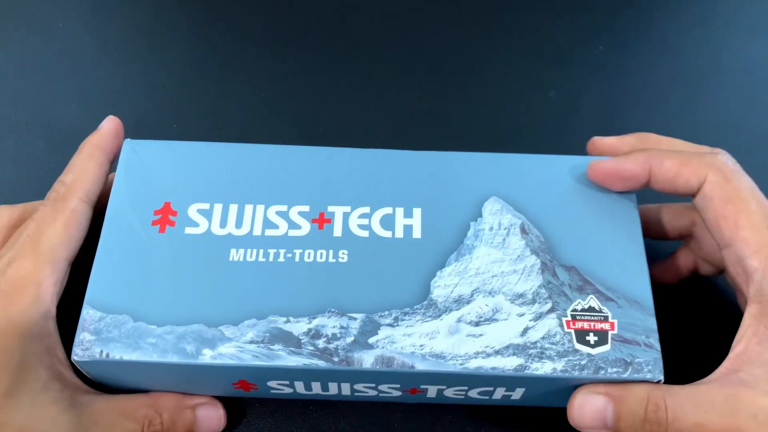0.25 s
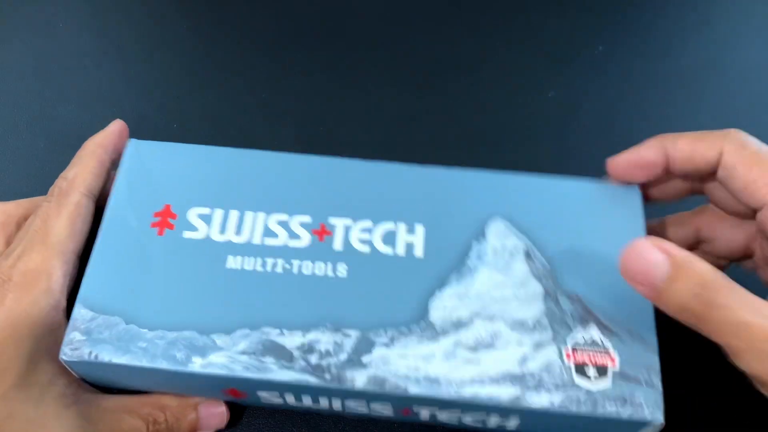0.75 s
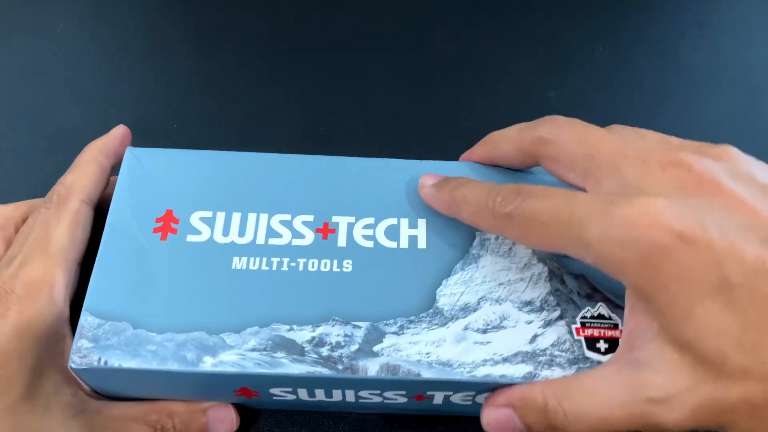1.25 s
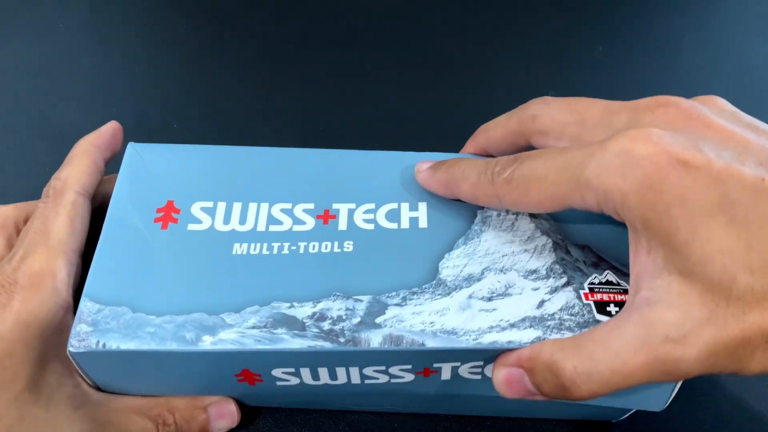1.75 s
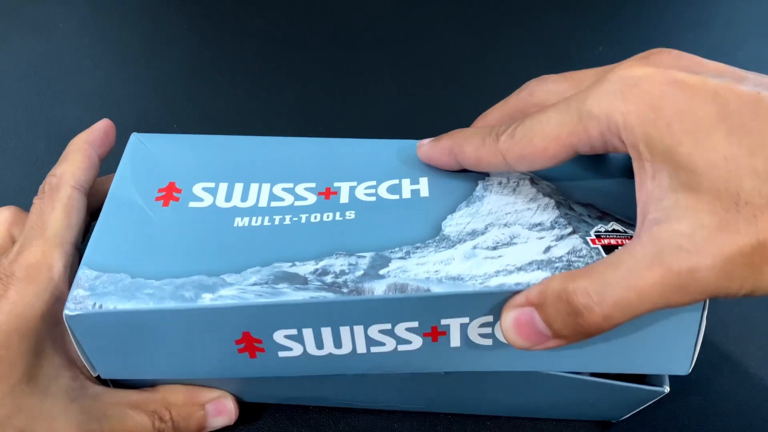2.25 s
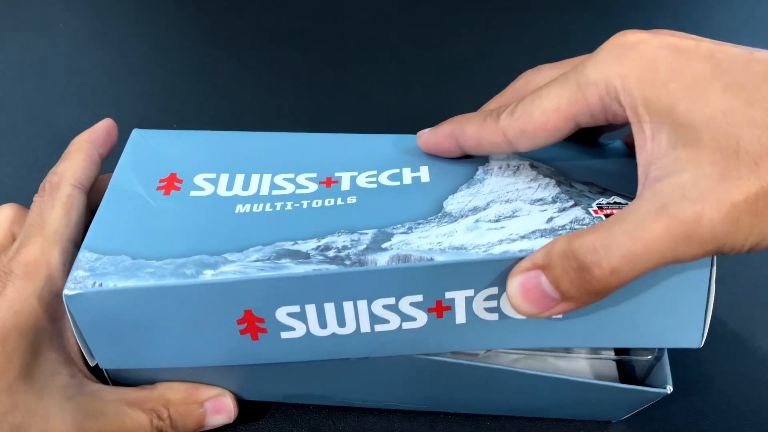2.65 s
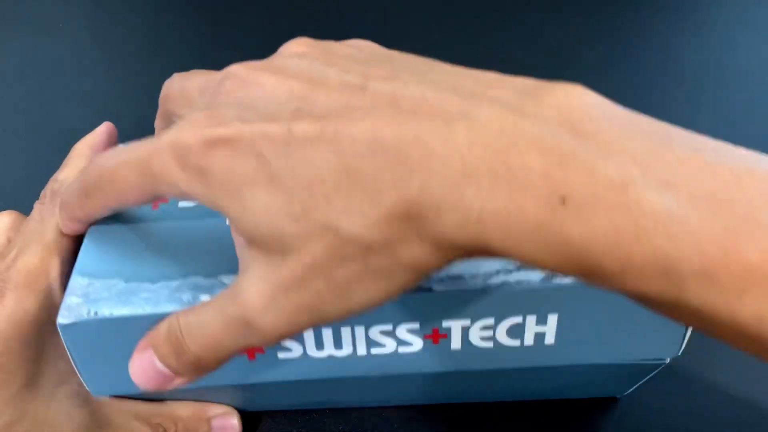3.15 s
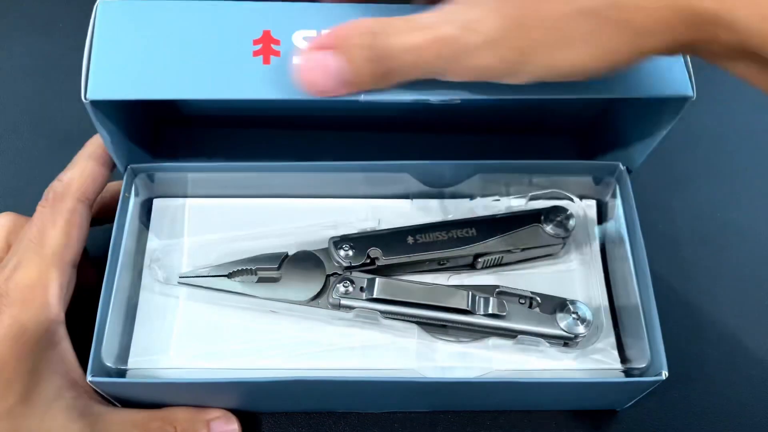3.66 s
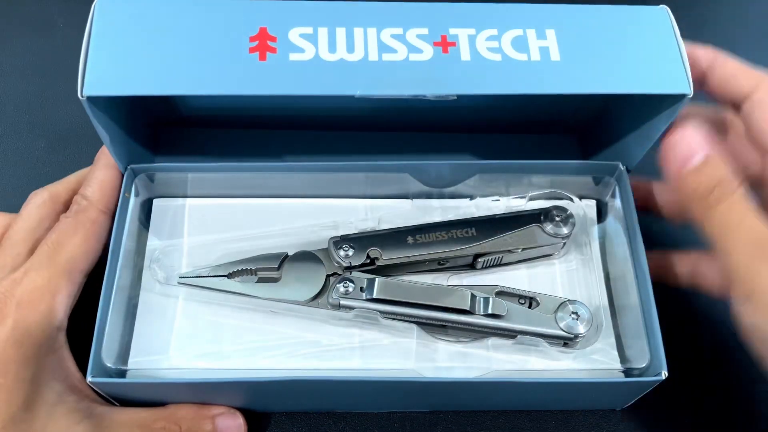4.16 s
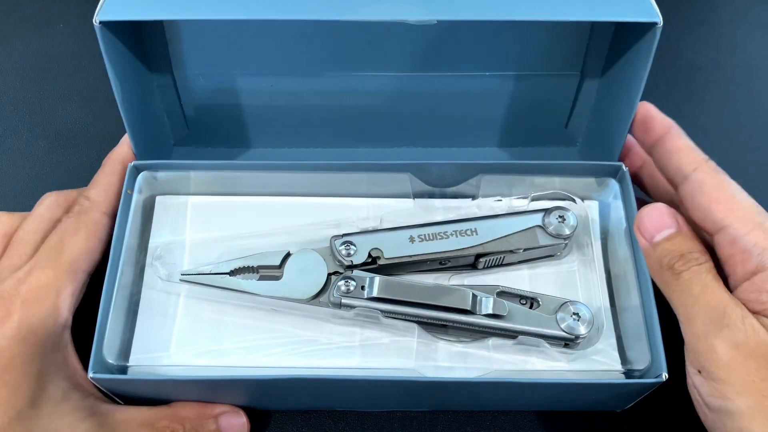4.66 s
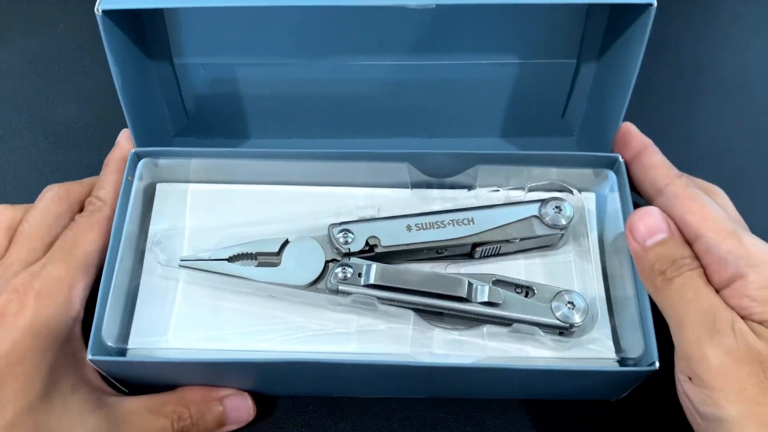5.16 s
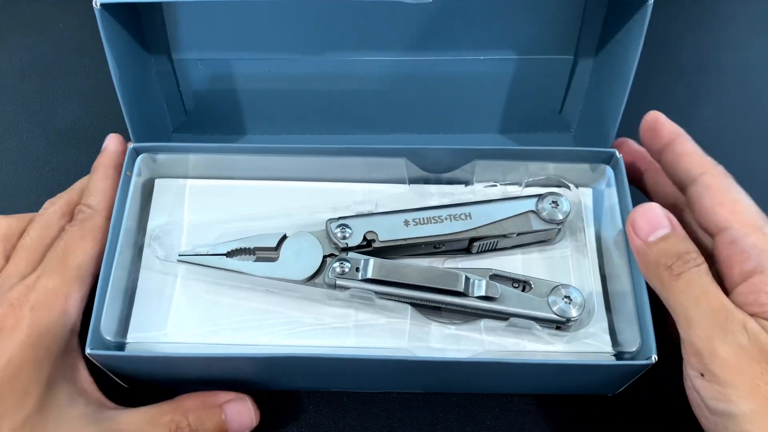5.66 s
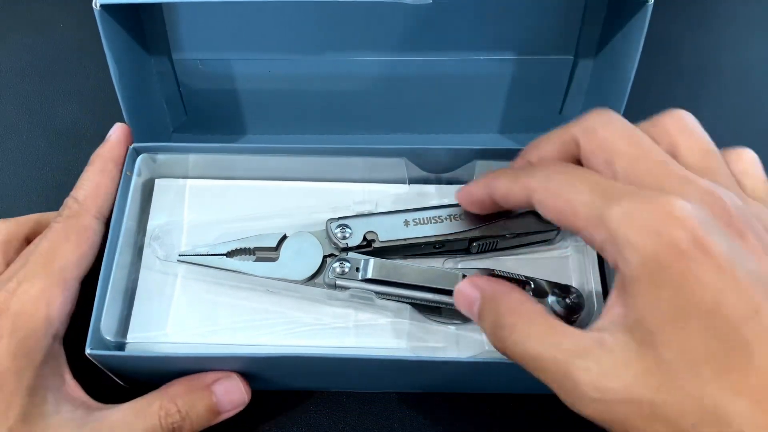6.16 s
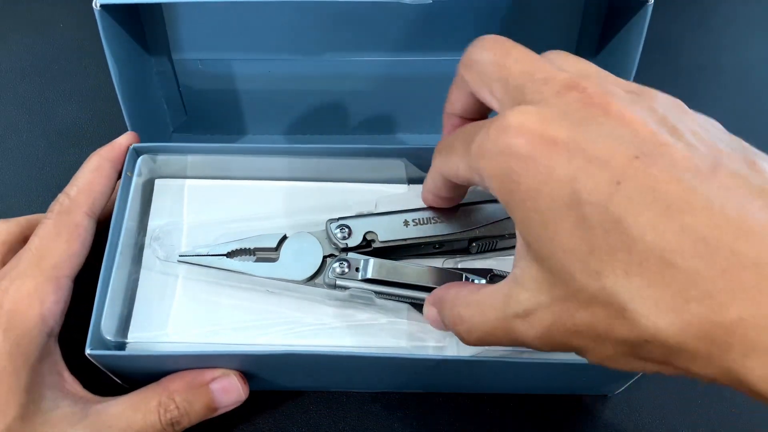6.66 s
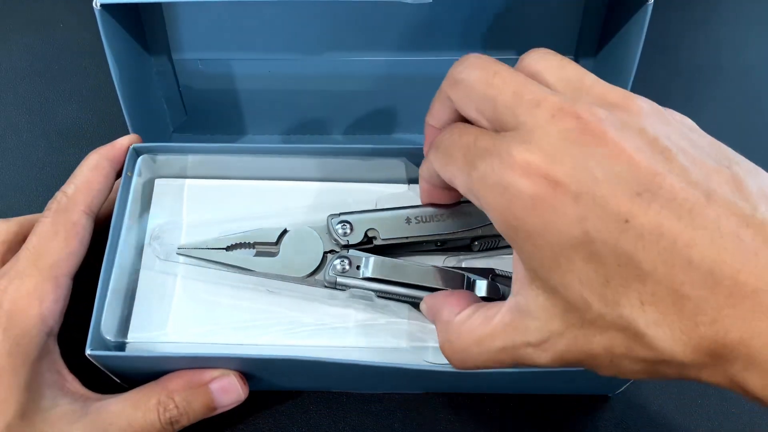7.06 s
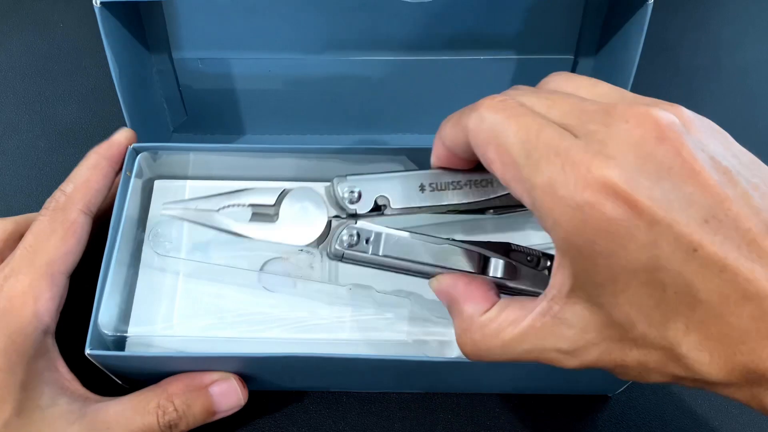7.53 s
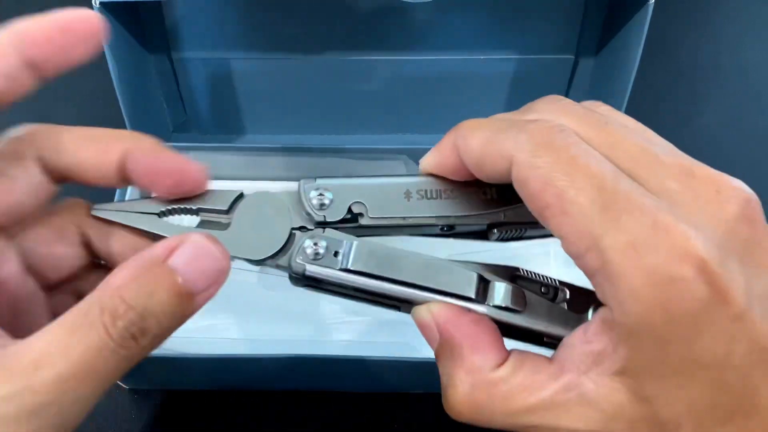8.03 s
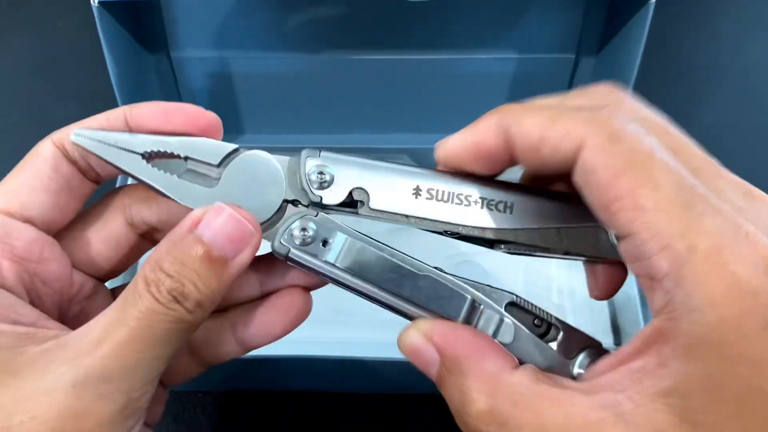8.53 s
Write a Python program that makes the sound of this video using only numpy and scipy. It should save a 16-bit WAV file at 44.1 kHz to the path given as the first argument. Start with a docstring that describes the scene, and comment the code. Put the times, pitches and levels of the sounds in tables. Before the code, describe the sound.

Close cardboard taps and a droning lid scrape lead to one hollow knock, faint rustles, then a sharp plastic snap in a quiet room.

```python
"""Taps, scrapes and a hard knock of cardboard, then plastic clicks that end in a loud snap, close by.
Hands turn a carton on a desk, drag its tight lid up and knock it open,
then press on the plastic tray inside until a steel multi-tool snaps free.
Blows ring damped panel modes and friction is made of random slips shaped by the walls; noise bands
give soft, gliding hiss and one very short tick. Behind lie room hiss and faint ventilation tones."""
import sys
import numpy as np
from scipy import signal
from scipy.fft import rfft, irfft, next_fast_len
from scipy.io import wavfile

SR = 44100
rng = np.random.default_rng(int(sys.argv[2]) if len(sys.argv) > 2 else 0)


def wav_record(signal):
    """Record a signal, one row per channel, as 16-bit PCM in the file named by sys.argv[1]."""
    frames = np.transpose(np.atleast_2d(signal))
    bounded = np.clip(frames, -1, 1)
    # unit amplitude maps onto the largest positive 16-bit level
    quanta = np.round(bounded * 32767).astype(np.int16)
    wavfile.write(sys.argv[1], SR, quanta)


N = 387638
TIME = np.arange(N) / SR  # s
# frequency bands of a contact, each (low f/Hz, high f/Hz)
THUMP, KNOCK, CRACK, TICK = (60, 300), (300, 1400), (1400, 7000), (10000, 16000)
BANDS = [THUMP, KNOCK, CRACK, TICK]


def carton_taps():
    """Fingers and lid strike the carton, whose card panels ring briefly."""
    # blows: t/s, force/dB, weight/dB re force, sharpness/dB re force, struck spot f/Hz
    taps = [(.081, -46.5, -12.5, -14, 705), (.2255, -61, -13, -13, 584), (.447, -39, -9, -16.5, 462),
            (.8075, -44, -8, -16.5, 880), (.876, -70, -1, 4, 1410), (1.069, -63, -5, -21, 720),
            (1.128, -62, -8, -19, 580), (1.238, -58.5, -26, -9.5, 990), (1.506, -41.5, -10, -19.5, 550),
            (1.5842, -40.5, -16, -5.5, 2220), (1.9232, -47.5, -25, -10.5, 820),
            (2.53, -58.5, -10, -8.5, 600), (2.93, -60.5, -3, -17, 1410), (2.972, -57, -7, -10, 1363),
            (3.0205, -49.5, -8, -16, 1080), (3.0435, -44, -16, -9.5, 1640), (3.2132, -35.5, -5.5, -30, 830),
            (3.24, -20, -17, -20.5, 590), (3.5015, -50, -20, -7, 604), (3.418, -71, 4, 1, 1390),
            (3.558, -56.5, 2, -22, 550), (3.7065, -52.5, -7, -11, 550), (4.215, -54.5, -15, -22.5, 770),
            (4.355, -61, 3.5, -11.5, 534), (4.436, -56.5, -9, -10.5, 550), (4.949, -65, -7.5, -16, 402),
            (5.0136, -60.5, 1, -13, 610), (5.028, -60, 0, -16, 600), (5.0775, -60.5, 2, -15, 610),
            (5.119, -57.5, -3, -16, 750), (5.34, -62, -20, 3.5, 1540), (5.57, -67, 1, -8, 790)]
    # panel modes of the carton: f/Hz, level/dB, t60 at the hardest blow/s
    modes = [(116,-19.5,0.06), (243,-13.5,0.049), (344.3,-6,0.027), (446,-9,0.059), (505,-6,0.044),
             (604,1.5,0.026), (791,-6,0.069), (878,-4.5,0.057), (1035,-7,0.031), (1121,-7,0.055),
             (1330,-7.5,0.0067), (1458,-17.5,0.1), (1610,-24.5,0.071), (2100,-29.5,0.062), (2140,-25,.04),
             (2650,-32.5,0.022), (3100,-33,0.012), (3780,-29.5,0.075), (4247,-30,0.013)]
    return blows(taps, modes, focus=0.55, max_focus_db=6.5, tick_db=-20.5, tick_t60=0.014,
                 crack_lag_s=.0008, tick_lag_s=.0015, rebound_s=.00505, rebound=.24, contact=1.5)


def tray_snaps():
    """The plastic tray buckles under the tool and rings at its own modes."""
    # snaps: t/s, force/dB, weight/dB re force, sharpness/dB re force, struck spot f/Hz
    snaps = [(5.9824, -59.5, -11, -15, 340), (6.1046, -60.5, -5, -4.5, 872),
             (6.2882, -60.5, -28.5, -3, 2530), (6.401, -64, -9, -0.5, 734), (6.5496, -49.5, -31, -14, 560),
             (6.695, -71.5, -3, 7, 850), (6.802, -53.5, -14, 1, 2340), (6.8674, -59.5, -29, -4, 990),
             (6.883, -38.5, -29, -21, 610), (7.1595, -25, -15.5, -11.5, 850), (7.231, -45.5, -19, -17, 576),
             (7.3765, -40, -30, -25, 1270), (7.426, -54.5, -18, -10, 594), (7.5888, -62.5, -7, -1, 800),
             (7.6795, -58.5, -7, -17, 735)]
    # modes of the tray: f/Hz, level/dB, t60 at the hardest blow/s
    modes = [(214,-8,0.033), (362,-3,0.032), (443,-6.5,0.045), (525,-4,0.04), (617,-3,0.1), (848,0,0.064),
             (996,-7,0.02), (1100,-5.5,0.043), (1280,-7,0.13), (1485,-13,0.023), (1660,-23,.04),
             (1920,-30.5,0.016), (2220,-29.5,0.17), (2510,-17,0.017), (2990,-12.5,0.032), (3460,-27,0.027),
             (3840,-32,0.024), (4270,-22,.018)]
    return blows(snaps, modes, focus=0.716, max_focus_db=9.5, tick_db=-27.5, tick_t60=.025,
                 crack_lag_s=0.001977, tick_lag_s=.004, rebound_s=0.00204, rebound=0.28, contact=4.2)


def blows(rows, modes, focus, max_focus_db, tick_db, tick_t60, crack_lag_s, tick_lag_s,
          rebound_s, rebound, contact):
    """Each blow rings the panel modes, with a brief crack of grit and a high tick on top."""
    crush_db, crush_t60, spot_width = -10.5, 0.04, .11  # dB, s, natural log of frequency ratio
    grit_colour = [(100, -1.5), (1000, 6.5), (2300, 3.5), (2900, -7),
                   (4000, -9), (7000, -17.5), (10000, -14.5)]  # f/Hz, level/dB
    out, t = np.zeros(N), np.arange(SR // 8) / SR
    hardest_db = max(row[1] for row in rows)
    hz, mode_db, t60 = np.transpose(modes)
    upper = hz > 1700
    for s, force_db, weight_db, sharp_db, spot_hz in rows:
        # a hard blow shakes every mode, a soft one mostly those of the struck spot
        softness_db = hardest_db - force_db
        nearness = np.exp(-(np.log(hz / spot_hz) / spot_width) ** 2)
        focus_db = min(focus * softness_db, max_focus_db) * nearness
        # soft blows detune the upper modes at random and damp them sooner
        detune = 1 + .07 * rng.standard_normal(len(hz)) * upper * min(softness_db / 10, 1)
        damping = 1 + upper * min(softness_db / 20, 1)
        body = ring(zip(hz * detune, mode_db + focus_db, t60 / damping), t)
        add(body, rebound_s, rebound * body.copy())  # the wall springs back and strikes again
        grit = unit(colour(rng.standard_normal(len(t)), grit_colour))
        body += amp(crush_db - 60 * t / crush_t60) * grit
        # a light contact is over at once: one short push and pull of air
        u = t / 0.00033
        body += contact * min(softness_db / 20, 1) * np.sin(2.8 * u) * np.exp(-u / 1.1)
        sources = [body, body, body, tick(t, tick_t60)]
        levels = band_levels(force_db, weight_db, sharp_db, tick_db)
        lags = [0, 0, crack_lag_s, tick_lag_s]
        for source, edges, db, lag in zip(sources, BANDS, levels, lags):
            add(out, *blow_band(s + lag, source, edges, db))
    return out


def blow_band(s, source, edges, db):
    """One band of a blow, with the energy of a steady 20 ms at its level; returns (start s, sound)."""
    blow_s, lead = .02, SR // 100  # the lead leaves space for the filter's pre-ringing
    part = band(np.pad(source, (lead, 0)), edges, order=2)
    return s - lead / SR, amp(db) * part * np.sqrt(blow_s * SR / np.sum(part ** 2))


def band_levels(force_db, weight_db, sharp_db, tick_db):
    """Levels of one contact: weight feeds the thump, sharpness the crack and the tick above it."""
    crack_db = force_db + sharp_db
    return force_db + weight_db, force_db, crack_db, crack_db + tick_db


def tick(t, t60):
    """A very short burst of noise, differenced six times to leave the highest treble."""
    burst = rng.standard_normal(len(t)) * amp(-60 * t / t60)
    return np.diff(burst, n=6, prepend=np.zeros(6))


def flicks():
    """A cut edge of the card catches and springs free with a thin, high tick."""
    # flicks: t/s, level/dB
    edge_flicks = [(1.9237, -60.5), (3.5025, -69), (5.341, -72)]
    out, t = np.zeros(N), np.arange(SR // 8) / SR
    for s, db in edge_flicks:
        add(out, *blow_band(s, tick(t, t60=0.018), TICK, db))
    return out


def slide():
    """The lid drags along the walls: the panels drone, the edge rasps, the fibres hiss."""
    # colours: f/Hz, level/dB
    panel_colour = [(60, -38.0), (180, -15.5), (270, -5), (480, -3.0), (598, -3), (690, -2.5),
                    (840, -2.0), (1150, -11.0), (1450, -19.5), (2000, -22.0), (2800, -35.5), (6000, -62)]
    edge_colour = [(900, -24.0), (1600, 1.5), (2030, -4.0), (2400, -6.0), (3000, -4.0),
                   (4200, -2.5), (5500, -17), (8000, -12), (10000, -32.5)]
    fibre_colour = [(7000, -61.5), (10000, -19.5), (12500, -5), (14500, 7), (16000, 5.0), (17000, -38.5)]
    drone, rasp, hiss = sliding_levels()
    slips = dragging()
    panel = amp(-0.85) * drone * unit(colour(slips, panel_colour))
    edge = amp(-2.5) * rasp * unit(colour(slips, edge_colour))
    fibres = amp(-2.0) * hiss * unit(colour(slips, fibre_colour))
    return panel + edge + fibres


def sliding_levels():
    """Gains of drone, rasp and hiss, ahead of the trims in slide(); a harder pull is brighter."""
    # hands shifting on the carton: start t/s, length/s, pressure level/dB
    rubs = [(0, 0.092, -60.5), (.27, 0.19, -66.5), (.47, 0.23, -62), (.66, 0.2, -60)]
    # the tight lid dragged up the walls: t/s, pull level/dB
    drag_path = [(1.22, -71), (1.25, -54), (1.48, -57.5), (1.62, -51.5), (1.8, -53), (1.93, -46),
                 (2.2, -54), (2.47, -55.5), (2.72, -56.5)]
    # the freed lid swinging back under the hand: t/s, drone level/dB, rasp level/dB, hiss level/dB
    swing_path = [(2.8, -66, -73, -71), (2.99, -63.5, -84, -85), (3.12, -54, -71, -81),
                  (3.22, -45.5, -58.5, -59), (3.33, -57, -72, -90), (3.56, -55, -75, -78),
                  (3.68, -65.5, -75, -73), (3.88, -74, -74, -73.5), (4.07, -61, -72.5, -82)]
    firm_db, release_s = -48.5, 0.045  # a firm pull, and how the drag dies away
    # level at a firm pull, and dB gained per dB of pull
    rasp_db, rasp_growth = -76.5, 1.7
    hiss_db, hiss_growth = -88, 2
    s, db = np.transpose(drag_path)
    release = np.exp(-np.maximum(TIME - s[-1], 0) / release_s)
    pull = amp(np.interp(TIME, s, db, left=-120) - firm_db) * release
    drag = np.array([amp(firm_db) * pull,
                     amp(rasp_db) * pull ** rasp_growth,
                     amp(hiss_db) * pull ** hiss_growth])
    hands = np.outer(amp([0, -22, -30]), touches(rubs))  # skin on card: drone, rasp, hiss in dB
    s, *columns = np.transpose(swing_path)
    swing = amp([np.interp(TIME, s, c, left=-120, right=-120) for c in columns])
    return hands + drag + swing


def dragging():
    """Slips of one sliding contact: an unsteady pull over fine fibres, with a few coarser snags."""
    wobble_colour = [(1, -8.5), (6, 2.5), (25, -7.0), (80, -61.5)]  # f/Hz, level/dB
    snag_db, unsteady_db = -11, 1.0  # gain of the snags, rms wobble of the pull
    wobble = unit(colour(rng.standard_normal(N), wobble_colour))
    fine = friction(N, per_s=2000, spread_db=0.2, smooth=.5)
    snags = friction(N, per_s=250, spread_db=0, smooth=0)
    return (fine + amp(snag_db) * snags) * amp(unsteady_db * wobble)


def card_scrapes():
    """Skin and lid scrape briefly on the card, heard through the carton walls."""
    # scrapes: middle t/s, length/s, force/dB, weight/dB re force, sharpness/dB re force
    strokes = [(.096, 0.059, -65, -6, -11), (.19, 0.042, -69, 3.5, -14), (.751, 0.031, -45, 1.5, -13.5),
               (2.44, 0.08, -54, -13, -20), (2.772, 0.071, -47.5, -8, -20),
               (2.807, 0.056, -44.5, -11.5, -5.5), (3.325, 0.019, -45.5, -11, -16),
               (3.285, .05, -48.5, -12.5, -12), (3.361, 0.036, -52.5, -34, -9),
               (3.525, 0.086, -55, -17, -20), (4.04, 0.066, -56.5, -15.5, -12.5),
               (4.235, 0.045, -56, -21, -18), (4.544, 0.04, -66, -10, -20), (4.84, 0.032, -68, -8, -13.5)]
    # colour of the card walls: f/Hz, level/dB
    walls = [(60, -6.5), (250, -6.5), (370, 3.5), (480, -6.5), (595, 2), (710, 4.5), (860, 1), (1050, -5),
             (1320, -5.5), (1700, -4.5), (2300, -8.5), (3000, -16), (4000, -18), (7000, -27.5),
             (10000, -44), (12500, -50), (15000, -32.5)]
    return scrapes(strokes, walls, tick_db=-12.5, slips_per_s=560, spread_db=4.0, smooth=0.535)


def tray_scrapes():
    """The tool scrapes in its plastic bed."""
    # scrapes: middle t/s, length/s, force/dB, weight/dB re force, sharpness/dB re force
    strokes = [(6.044, 0.037, -59, 0, -20), (6.417, 0.035, -62, -24.5, -16), (7.105, 0.052, -60, -9, -11.5),
               (7.138, 0.0085, -60, -14.5, -26), (7.156, 0.0076, -36.5, -18, -33),
               (7.214, 0.055, -44.5, -9, -12.5), (7.366, 0.03, -43, -24, -11),
               (7.398, 0.031, -46.5, -17, -14.5), (7.664, 0.024, -81.5, -3, 13.5)]
    # colour of the plastic tray: f/Hz, level/dB
    walls = [(60, -20), (250, -11), (370, 3), (520, -1), (590, 11.5), (710, 0.5), (850, 5), (1000, -13),
             (1290, 1), (1450, -4.5), (1900, -8.5), (2280, -4.5), (3100, -18.5), (3800, -16), (4600, -32),
             (7000, -37), (10000, -49), (15000, -21)]
    return scrapes(strokes, walls, tick_db=-26, slips_per_s=600, spread_db=-1.5, smooth=0.41)


def scrapes(rows, walls, tick_db, slips_per_s, spread_db, smooth):
    """Brief bursts of slips shake the walls, which colour them."""
    out, t = np.zeros(N), np.arange(-SR // 8, SR // 8) / SR
    for middle, length, force_db, weight_db, sharp_db in rows:
        stroke = np.exp(-np.abs(t / (0.56 * length)) ** 2.7)
        slips = colour(friction(len(t), slips_per_s, spread_db, smooth), walls)
        for edges, db in zip(BANDS, band_levels(force_db, weight_db, sharp_db, tick_db)):
            part = band(slips, edges) * stroke
            # the energy of a steady sound of the scrape's length
            add(out, middle + t[0], amp(db) * part * np.sqrt(length * SR / np.sum(part ** 2)))
    return out


def grip():
    """Fingertips creep over box and tray with a fine rustle of slips."""
    # touches: start t/s, length/s, pressure level/dB
    grips = [(4.25, .33, -68), (4.79, 0.052, -75), (4.93, 0.18, -67), (6.02, 0.14, -69), (6.45, 0.33, -65),
             (6.82, 0.19, -64.5), (7.1, 0.2, -55), (7.39, 0.04, -58), (7.52, 0.13, -68)]
    rustle_colour = [(100, -41.0), (300, -0.5), (480, -4.0), (595, -0.5), (700, 1.0), (860, -2),
                     (1300, -14), (1800, -15), (2300, -17.5), (4000, -33), (7000, -39.5),
                     (10000, -65.0)]  # f/Hz, level/dB
    slips = friction(N, per_s=900, spread_db=2, smooth=.5)
    return touches(grips) * unit(colour(slips, rustle_colour))


def touches(rows):
    """Pressure of a series of touches: each builds up, holds, then dies away."""
    attack_s, release_s = 0.022, 0.042
    pressure = np.zeros(N)
    for start, length, db in rows:
        attack = np.clip((TIME - start) / attack_s, 0, 1)
        release = np.exp(-np.maximum(TIME - start - length, 0) / release_s)
        pressure += amp(db) * attack * release
    return pressure


def friction(size, per_s, spread_db, smooth):
    """Surfaces catching and letting go: tiny random slips of uneven force over a smooth hiss."""
    slips = rng.standard_normal(size) * (rng.random(size) < per_s / SR)
    slips *= amp(spread_db * np.minimum(rng.exponential(1, size), 4))
    return unit(slips) * (1 - min(smooth, 1)) + smooth * rng.standard_normal(size)


def noise_bands():
    """Low-passed noise on a moving tone: soft, gliding bands of hiss, and one very short tick near 4.3 kHz."""
    # hiss bands and the 2 ms tick: start t/s, end t/s, start f/Hz, end f/Hz, bandwidth/Hz, level/dB
    bursts = [(3.112, 3.292, 3670, 4060, 910, -70), (3.455, 3.81, 4190, 3820, 600, -87),
              (3.732, 3.98, 4300, 4520, 605, -84), (3.785, 3.925, 3130, 3330, 129, -81),
              (6.831, 6.833, 4330, 4200, 1500, -62), (5.658, 5.84, 5600, 6370, 597, -94),
              (8.445, 8.718, 5150, 3980, 600, -85.5)]
    out = np.zeros(N)
    for start, end, start_hz, end_hz, width_hz, db in bursts:
        size = round((end - start) * SR)
        lowpass = signal.butter(2, width_hz / 2, fs=SR, output="sos")
        noise = signal.sosfilt(lowpass, rng.standard_normal(size))
        carrier = np.cos(2 * np.pi * np.cumsum(np.linspace(start_hz, end_hz, size)) / SR)
        fade = signal.windows.tukey(size, .7)
        add(out, start, amp(db) * unit(noise * carrier * fade))
    return out


def room(x, wet_db, hollow_db):
    """The hollow box hums on after each sound, and the walls return a short diffuse tail."""
    # long ring of the hollow box: f/Hz, level/dB, t60/s
    hollow_modes = [(360, -9, 0.3), (441, -8, .2), (592, 2, .21), (890, -6.5, 0.13), (1317, -10, 0.14),
                    (1440, -14, .14)]
    # room decay: f/Hz, t60/s
    decay = [(100, .3), (500, 0.23), (2000, 0.14), (6000, 0.083), (15000, 0.13)]
    tail_colour = [(100, 1.0), (600, -8.5), (2500, -1.5), (6000, 4.0), (15000, 1.5)]  # f/Hz, level/dB
    t = np.arange(SR // 2) / SR
    # sparse random reflections, none before 9 ms
    taps = rng.choice([-1., 1.], len(t)) * (rng.random(len(t)) < 3000 / SR) * (t > .009)
    hz, when, z = signal.stft(taps, SR, nperseg=256)
    fading = z * amp(-60 * when / read(decay, hz)[:, None])
    tail = signal.istft(fading, SR, nperseg=256)[1][:len(t)]
    tail = colour(tail / np.linalg.norm(tail), tail_colour)
    hollow = ring(hollow_modes, t)
    hollow = hollow / abs(rfft(hollow)).max()
    echo = amp(wet_db) * tail + amp(hollow_db) * hollow
    return x + signal.fftconvolve(x, echo)[:N]


def air():
    """Steady room hiss with a few ventilation tones: narrow noise bands that waver."""
    # hiss colour: f/Hz, relative density level/dB per Hz
    hiss_colour = [(12, -26.5), (20, 2), (81, -4), (116, -11), (150, -6.5), (204, -17.5), (234, -6),
                   (262, -10), (422, -13), (698, -15.5), (849, -15.5), (923, -18.5), (4810, -34),
                   (10200, -50.5), (16000, -39)]
    # ventilation tones: f/Hz, width/Hz, level/dB
    hum = [(128.8, 8, -82.5), (237.4, 3.7, -79), (815, 3.5, -80.5)]
    hz = np.fft.rfftfreq(N, 1 / SR)
    out = amp(-66.52) * unit(colour(rng.standard_normal(N), hiss_colour))
    for f, width, db in hum:
        resonance = 1 / (1 + (2 * (hz - f) / width) ** 2)
        out += amp(db) * unit(irfft(rfft(rng.standard_normal(N)) * resonance, N))
    return out


def ring(modes, t):
    """Damped modes set off together; neighbouring modes swing in opposite directions."""
    return sum((-1) ** k * amp(db - 60 * t / t60) * np.sin(2 * np.pi * hz * t)
               for k, (hz, db, t60) in enumerate(modes))


def amp(db):
    """Decibels to gain."""
    return 10 ** (np.asarray(db) / 20)


def unit(x):
    """Scales to rms 1."""
    return x / np.sqrt(np.mean(x ** 2) + 1e-30)


def read(points, hz):
    """Reads a table on a log-frequency axis."""
    f, value = np.transpose(points)
    return np.interp(np.log(hz + 1), np.log(f + 1), value)


def colour(x, points):
    """Gives x a spectral shape."""
    size = next_fast_len(len(x))
    gain = amp(read(points, np.fft.rfftfreq(size, 1 / SR)))
    return irfft(rfft(x, size) * gain, size)[:len(x)]


def band(x, edges, order=3):
    """Band-pass that keeps all bands aligned in time."""
    return signal.sosfiltfilt(signal.butter(order, edges, "bandpass", fs=SR, output="sos"), x)


def add(mix, s, sound):
    """Mixes a sound in at time s."""
    part = mix[max(round(s * SR), 0):][:len(sound)]
    part += sound[:len(part)]


def scene():
    """Contacts sound the hollow box and the room; slides, noise bands and air are mixed in dry."""
    contacts = carton_taps() + tray_snaps() + flicks() + card_scrapes() + tray_scrapes() + grip()
    mix = room(contacts, wet_db=-14, hollow_db=-1) + slide() + noise_bands() + air()
    return mix[None]


def record(dry):
    """The recorder's band limit: a steep low-pass at 15.9 kHz."""
    lowpass = signal.firwin(511, 15900, window=("kaiser", 9), fs=SR)
    return signal.oaconvolve(dry, lowpass[None], "same")


dry = scene()
out = record(dry)
wav_record(out)
```